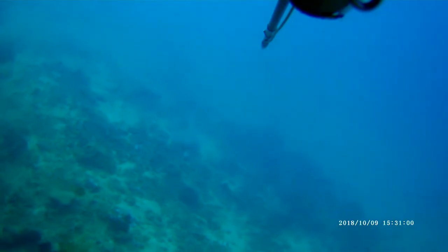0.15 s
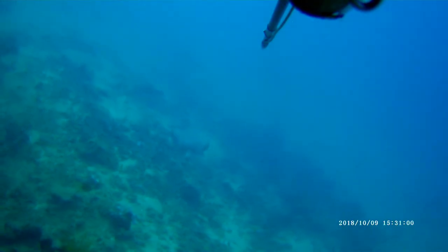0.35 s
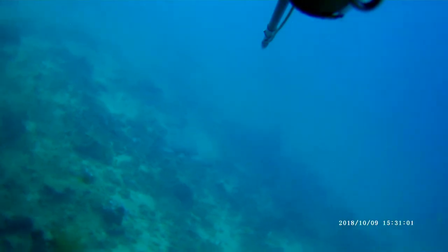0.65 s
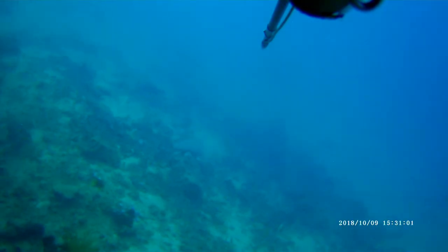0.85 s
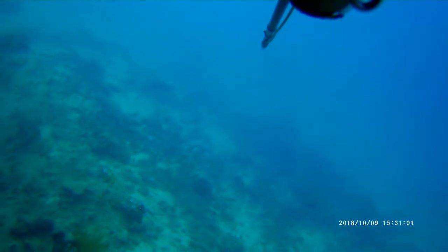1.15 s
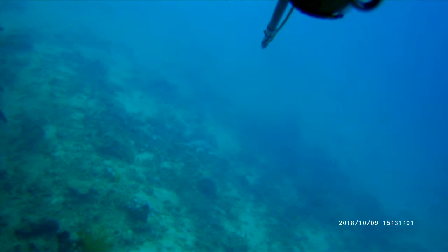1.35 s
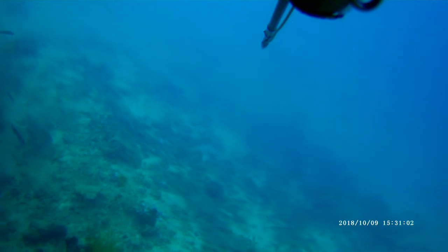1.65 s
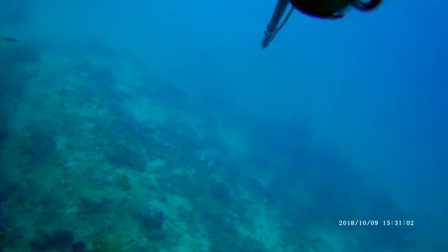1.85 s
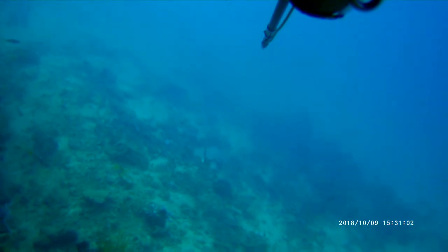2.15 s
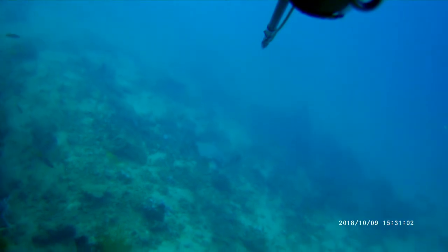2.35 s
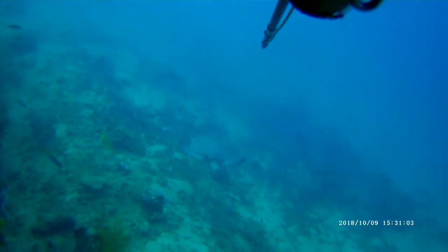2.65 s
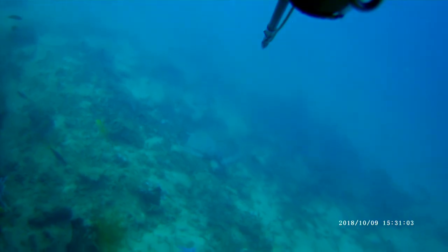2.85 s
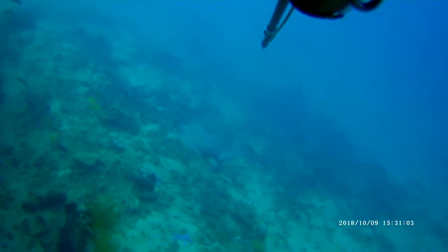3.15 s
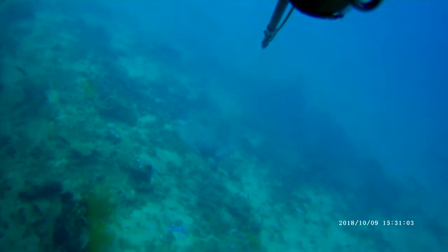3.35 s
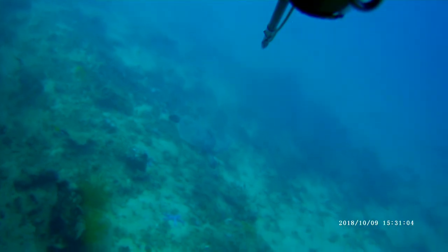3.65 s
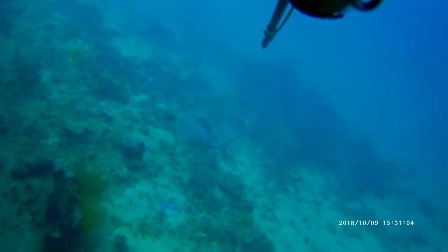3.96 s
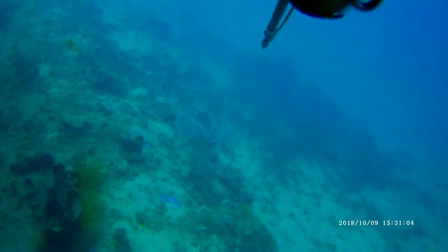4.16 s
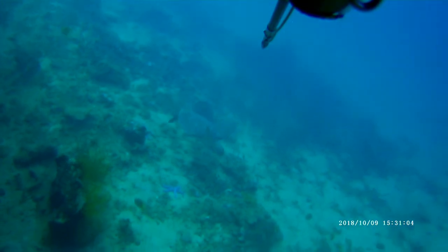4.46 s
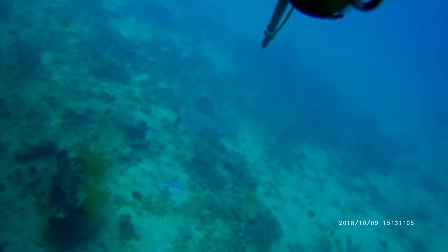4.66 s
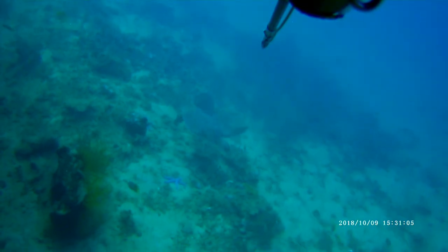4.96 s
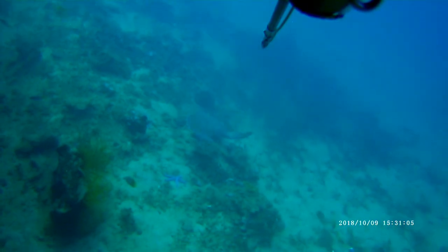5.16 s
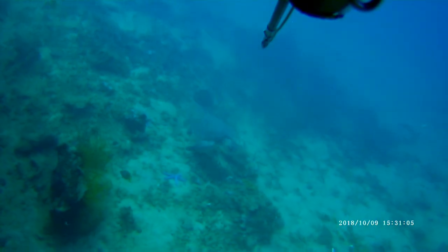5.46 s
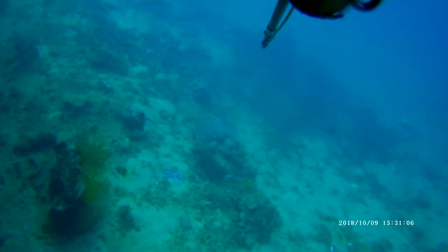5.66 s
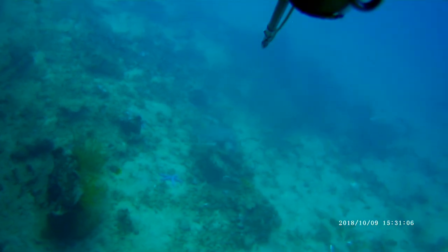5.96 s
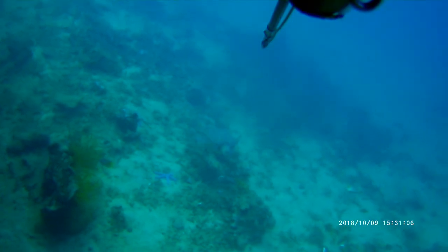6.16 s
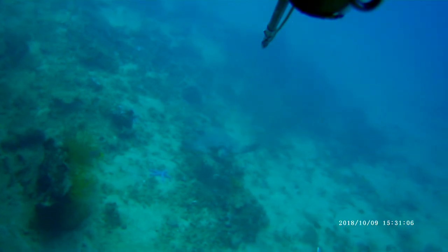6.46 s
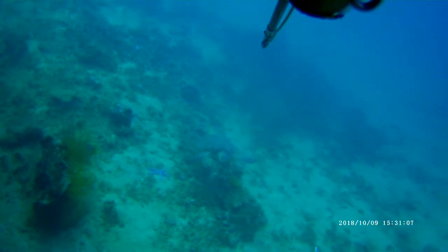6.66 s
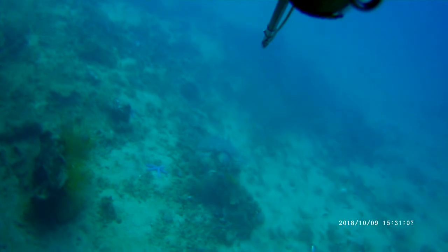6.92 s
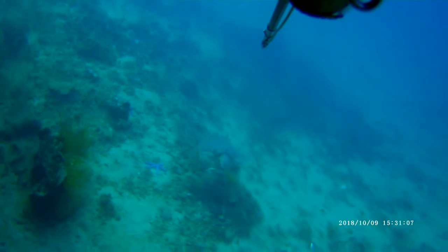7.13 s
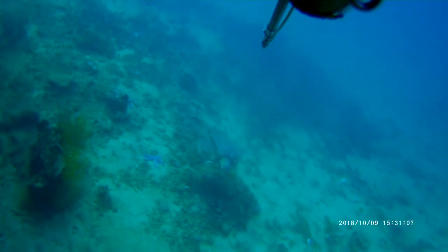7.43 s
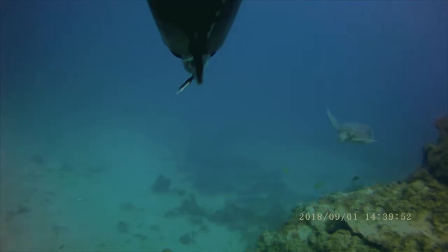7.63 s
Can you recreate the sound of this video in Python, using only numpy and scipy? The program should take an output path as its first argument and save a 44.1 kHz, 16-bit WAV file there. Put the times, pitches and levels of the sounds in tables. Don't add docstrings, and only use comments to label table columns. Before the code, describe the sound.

Throughout, a quiet, muffled wash of water and faint electronic hiss fills a sealed camera housing, sprinkled with fine distant shrimp crackle and dull gurgling squeaks. At 0.2 s a short bubbly blip rings and dies; around 0.4 s the case groans briefly with a soft knock and scrape. From 1.45 to 1.9 s comes a quick cluster of hollow, mid-pitched knocks, each doubled by a close echo, then another at 2.3 s. Until 4 s there are only faint ticks, far knocks and a low flexing moan. Louder knocks land at 4.05, 4.4 and 4.65 s, with a strong ringing snap near 4.45 s. After a lull, more knocks come between 5.6 and 6.1 s, and at 6.4 and 6.6 s, the last among the loudest. From 6.8 s scratchy scrapes and small knocks gather, and rubbing swells around 7.5 s before easing at the end.

```python
import sys
import numpy as np
from scipy import signal
from scipy.io import wavfile
from scipy.ndimage import uniform_filter1d

SR = 44100
rng = np.random.default_rng(int(sys.argv[2]) if len(sys.argv) > 2 else 0)


def int16_out(signal):
    q = np.round(np.clip(np.atleast_2d(signal).T, -1, 1) * 32767)
    wavfile.write(sys.argv[1], SR, q.astype(np.int16))


def gain_from_db(level_db):
    decades = np.asarray(level_db, float) / 20
    return 10 ** decades


N = 343539


def evened(x):
    return x / np.sqrt(np.mean(x ** 2) + 1e-20)


def smoothed(x, size):
    return uniform_filter1d(uniform_filter1d(x, size=size), size=size)


def add(mix, s, sound):
    part = mix[round(s * SR):][:len(sound)]
    part += sound[:len(part)]


def resonate(x, hz, width):
    turn = np.exp(2j * np.pi * np.cumsum(hz * np.ones(len(x))) / SR)
    r = np.exp(-np.pi * width / SR)
    return 2 * (turn * signal.lfilter([1 - r], [1, -r], x / turn)).real


def twice(x, hz, width):
    return resonate(resonate(x, hz, width), hz, width)


def sparse(per_s, spread_db):
    when = rng.random(N) < per_s / SR
    size = np.minimum(rng.exponential(1, N), 4)
    sign = rng.choice([-1., 1.], N)
    return evened(when * gain_from_db(spread_db * size) * sign)


def gaussian_burst(t, ms, hz):
    return np.exp(-.5 * (1000 * t / ms) ** 2) * np.cos(2 * np.pi * hz * t)


def housing(tilt_db=0, spread_db=0, damp_db=0):
    # f/Hz, width/Hz, level/dB, arrival/ms, second pass/dB
    modes = [(730.0, 590.0, -25.1, 0.36, -3), (1090.0, 180.0, -27.2, 0.79, -2),
             (1310.0, 270.0, -5.3, 0.59, -4), (1500.0, 60.0, -16.7, 0.84, -3),
             (1710.0, 700.0, -14.1, 0.21, -10), (2290.0, 250.0, -14.7, 0.26, -14),
             (3200.0, 200.0, -12.0, 0.5, 0), (3260.0, 190.0, -5.9, 0.38, -4),
             (4590.0, 390.0, -5.0, 0.81, -24), (5540.0, 790.0, -22.3, 0.25, -32),
             (6150.0, 530.0, -18.4, 0.07, -27), (7780.0, 390.0, -51.7, 0.09, -7),
             (9180.0, 300.0, -50.0, 0.68, -9), (11160.0, 1820.0, -73.9, 0.48, 0)]
    hz, width, db, ms, again_db = np.transpose(modes)[:, :, None]
    round_trip_ms = 2.9
    t, out = np.arange(768) / SR, 0
    direction_db = spread_db * rng.standard_normal((2, len(modes), 1))
    first_pass = (0, direction_db[0])
    second_pass = (round_trip_ms, again_db - damp_db + direction_db[1])
    for late_ms, pass_db in (first_pass, second_pass):
        age = np.maximum(t - (ms + late_ms) / 1000, 0)
        u = np.pi * 3 * width * age
        height = gain_from_db(db + pass_db + tilt_db * np.log2(hz / 4480)) * width
        out = out + (height * u ** 3 * np.exp(-u) * np.sin(2 * np.pi * hz * age)).sum(0)
    return signal.lfilter(*signal.butter(3, 500, "high", fs=SR), out)


def read(points, hz):
    f, value = np.transpose(points)
    return np.interp(np.log(hz + 1), np.log(f + 1), value)


def noise(spectrum, patchy_db):
    frames, hz = N // 256 + 5, np.fft.rfftfreq(1024, 1 / SR)
    a, b, patches = rng.standard_normal((frames, 513, 3)).T
    patches = uniform_filter1d(patches, size=10, axis=0)
    patches = evened(uniform_filter1d(patches, size=6, axis=1))
    z = (a + 1j * b) * gain_from_db(read(spectrum, hz)[:, None] + patchy_db * patches)
    return evened(signal.istft(z, nperseg=1024, noverlap=768)[1][:N])


def wash():
    # f/Hz, level per Hz/dB
    water, water_db = [(15, -86), (25, -49.5), (294, -8), (485, -5.5), (832, -6.5), (1370, -4),
                       (1710, -9.5), (1970, -12), (3000, -17), (3900, -49.5), (6600, -120)], -67.5
    # f/Hz, level per Hz/dB
    hiss, hiss_db = [(1530, -26), (2600, -9), (3430, -0.5), (4070, -5.5), (5350, -9.5), (5600, -12.5),
                     (6320, -15.5), (7210, -22.5), (8200, -23), (9500, -26), (10200, -50.5), (15900, -87)], -79.5
    # f/Hz, width/Hz, level/dB
    whines = [(5180, 20, -90.5), (7825, 8, -106), (7885, 8, -104)]
    out = gain_from_db(water_db) * noise(water, 1.5) + gain_from_db(hiss_db) * noise(hiss, 1.0)
    for hz, width, db in whines:
        wander = np.cumsum(rng.standard_normal(N)) * np.sqrt(2 * np.pi * width / SR)
        out += gain_from_db(db) * np.sqrt(2) * np.sin(2 * np.pi * hz * np.arange(N) / SR + wander)
    return out


def gurgle():
    out, t = np.zeros(N), np.arange(-600, 600) / SR
    pitches = np.geomspace(950, 2300, num=16)
    for hz, ms, glide in zip(pitches, rng.uniform(2, 4, 16), rng.normal(0, 5, 16)):
        squeak = gaussian_burst(t, ms, hz * (1 + glide * t))
        out += signal.oaconvolve(sparse(45, 3.8), evened(squeak), "same")
    return evened(out)


def strain(t):
    # middle t/s, half length/s, wall moan level/dB, low frame groan level/dB
    flexes = [(0.043, .1, -84, -77), (0.392, 0.062, -51, -56), (0.519, 0.058, -64.5, -68),
              (1.023, 0.041, -82, -77), (2.67, 0.25, -72, -76.5), (3.134, 0.099, -68.5, -74),
              (3.43, 0.055, -72.5, -90), (3.653, 0.064, -74, -79.5), (4.187, 0.18, -64.5, -70),
              (6.307, 0.038, -69, -89), (6.855, 0.19, -65.5, -92), (7.284, 0.072, -59, -94),
              (7.501, 0.19, -63.5, -88)]
    s, half, moan_db, groan_db = np.transpose(flexes)[:, :, None]
    bump = np.exp(-((t - s) / half) ** 2)
    moan_gain = gain_from_db(-80.5) + (gain_from_db(moan_db) * bump).sum(0)
    groan_gain = gain_from_db(-88.5) + (gain_from_db(groan_db) * bump).sum(0)
    return moan_gain, groan_gain


def rubbing():
    # t/s, level/dB
    effort = [(0.0, -65.5), (0.28, -69), (0.37, -63.5), (0.47, -64), (0.56, -61), (0.67, -67),
              (1.67, -64.5), (1.78, -60), (1.93, -66.5), (2.6, -66.5), (3.9, -68), (4.1, -61.5), (4.2, -69),
              (5.2, -66), (6.6, -66), (6.82, -58.5), (7.55, -52.5), (7.68, -62)]
    # f/Hz, width/Hz, level/dB
    frame = [(160, 35, -3), (250, 30, 0)]
    t = np.arange(N) / SR
    rub_db = np.interp(t, *np.transpose(effort))
    moan_gain, groan_gain = strain(t)
    hz = 1400 - 200 * np.minimum(moan_gain / gain_from_db(-60), 1)
    shake, hush, drift = rng.standard_normal((3, N))
    dull = twice(gurgle() + 1.1 * hush + 1.6 * sparse(350, 3.1), hz, 1300)
    rub = evened(signal.oaconvolve(dull, housing(0.52))[:N])
    rub = evened(rub + 1.9 * evened(twice(dull, 1553, 1300)))
    clumps_db = 2.5 * evened(smoothed(drift[::-1], 500))
    groan = evened(sum(gain_from_db(db) * twice(shake, f, width) for f, width, db in frame))
    wall_hz = 1050 * (1 + .03 * evened(smoothed(drift, 3000)))
    moan = evened(twice(shake, wall_hz, 200))
    return gain_from_db(rub_db - 3.0 + clumps_db) * rub + gain_from_db(-7.5) * groan_gain * groan + moan_gain * moan


def knock(db, hz, ms):
    t = np.arange(-256, 256) / SR
    push = gaussian_burst(t, np.clip(ms, .12, 2), hz)
    thud_db = -5.9 * max(ms - .4, 0) - 0.046 * (hz - 1241.5) + .5 * (db + 24.5)
    thud = gain_from_db(thud_db) * gaussian_burst(t, 0.75, 820)
    edge = gaussian_burst(t, 0.35, 3200)
    sound = np.convolve(push + thud, housing(-3, 2.5, 2.5))
    sound[60:572] += gain_from_db(-35.5 + .4 * (db + 20.5)) * abs(sound).max() * edge
    sound = signal.lfilter(*signal.butter(3, 640, "high", fs=SR), sound)
    return abs(sound).argmax() / SR, gain_from_db(db) * sound / abs(sound).max()


def knocks():
    # t/s, peak level/dB, centre f/Hz, surface echo delay/ms, echo level/dB
    near = [(0.391, -38.5, 1040, 16, -5), (1.462, -30, 1150, 13.8, -1), (1.5194, -27.5, 1250, 15, -7),
            (1.558, -27.5, 1200, 15.6, -6.5), (1.6214, -29, 1180, 15.6, -5), (1.734, -27, 1310, 12.6, -7),
            (1.8843, -29.5, 1310, 12.3, -10), (2.31, -27.5, 1262, 12.2, -8), (4.048, -22.5, 1290, 13, -23),
            (4.4184, -22.5, 1250, 24, -27), (4.637, -21.5, 1300, 16.5, -29),
            (5.5897, -20.5, 1330, 16.6, -26), (5.8294, -21, 1330, 14.2, -22.5),
            (5.9723, -24, 1296, 13.8, -10.5), (6.105, -30, 1250, 13.4, -9), (6.4361, -24, 1320, 13, -18),
            (6.577, -18, 1310, 21.8, -21), (6.885, -35, 1270, 13.0, -4.5), (7.037, -38, 1460, 8.7, -7),
            (7.3087, -38, 1326, 10, -8), (7.4784, -29, 1125, 13.6, -8), (7.5064, -34.5, 1300, 11.5, -3.5),
            (7.5888, -30, 1100, 13.6, -9), (7.6279, -36, 1250, 13, -3.5)]
    # t/s, peak level/dB, centre f/Hz
    faint = [(0.077, -45.5, 1310), (0.575, -43.5, 1620), (0.748, -41, 1360), (1.194, -47.5, 1400),
             (1.6, -55, 1500), (2.129, -48.5, 1450), (2.236, -46, 1470), (2.409, -43.5, 1630),
             (2.56, -49, 1280), (2.869, -41.5, 1190), (2.882, -44.5, 1110), (3.051, -47, 1400),
             (3.078, -43.5, 1200), (3.369, -50.5, 1380), (3.41, -42.5, 1140), (3.592, -48.5, 1350),
             (3.898, -45.5, 1400), (3.991, -46.5, 1480), (4.805, -48, 1330), (5.058, -48.5, 1360),
             (5.782, -47.5, 1380), (5.818, -43.5, 1460), (6.46, -41.5, 1480), (6.526, -45, 1365),
             (6.537, -46, 1310), (6.807, -45.5, 1460), (6.832, -45, 1370), (6.877, -45.5, 1395),
             (6.918, -39, 1450), (7.612, -36.5, 1280)]
    # t/s, peak level/dB, centre f/Hz
    scrapes = [(0.348, -55, 1050), (0.364, -50, 1070), (0.371, -44.5, 1040), (0.385, -41.5, 1098),
               (0.468, -48.5, 1400), (1.814, -46.5, 1490), (2.04, -52, 1120), (2.217, -55.5, 950),
               (2.67, -55, 1040), (3.131, -51.5, 1010), (3.666, -53.5, 1110), (5.335, -52, 960),
               (5.612, -48.5, 1330), (6.469, -48.5, 1490), (6.93, -50, 1305), (6.959, -46, 1380),
               (7.031, -39, 1465), (7.08, -41.5, 1457), (7.092, -45.5, 1360), (7.165, -46.5, 1324),
               (7.2, -50, 1340), (7.244, -44, 1205), (7.284, -40, 1220), (7.297, -48, 1332),
               (7.414, -54, 1423), (7.535, -53.5, 1240)]
    near_ms, faint_ms, scrape_ms = 0.31, 0.29, 1.8
    out = np.zeros(N)
    for s, db, hz, echo_ms, echo_db in near:
        rise, sound = knock(db, hz, near_ms)
        add(out, s - rise, sound)
        rise, echo = knock(db + echo_db, 1.05 * hz, 1.1 * near_ms)
        add(out, s - rise + echo_ms / 1000, -echo)
    for rows, ms in ((faint, faint_ms), (scrapes, scrape_ms)):
        for s, db, hz in rows:
            rise, sound = knock(db, hz, ms)
            add(out, s - rise, sound)
    return out


def bubbles():
    # t/s, f/Hz, peak level/dB, t60/s
    loose = [(.2042, 1640, -27, .036), (.2162, 1490, -39, .11), (.2052, 945, -41, .12),
             (.2042, 1300, -33, .02), (3.0742, 525, -51, .03), (3.0742, 340, -54, .03),
             (6.9172, 2120, -48, .03), (6.9182, 1830, -49, .03), (7.3022, 2380, -53, .035),
             (7.4122, 2480, -50, .03), (7.5752, 2750, -61, .03)]
    sink, sink_s = 0.056, 0.0072
    out, t = np.zeros(N), np.arange(6000) / SR
    turns = t + sink * sink_s * (1 - np.exp(-t / sink_s))
    for s, hz, db, t60 in loose:
        start = (1 - np.exp(-t / 0.0011)) ** 2
        add(out, s, gain_from_db(db - 60 * t / t60) * start * np.sin(2 * np.pi * hz * turns))
    return out


def dry_burst():
    ms = 1000 * np.arange(768) / SR
    burst = rng.standard_normal(768) * ms * np.exp(-ms / .9)
    burst = signal.sosfilt(signal.butter(4, (2000, 4600), "band", fs=SR, output="sos"), burst)
    return burst / abs(burst).max()


def snaps():
    # t/s, peak level/dB, low ring against the treble/dB, crack level/dB
    shrimp = [(0.4796, -60, -3.5, -22.5), (1.0294, -58.5, -4, -26), (1.071, -60.5, -3, -24.5),
              (1.368, -67, 0, -27), (1.687, -63, 2, -21), (1.7556, -56, 0, -24), (1.7918, -58, 2, -27),
              (1.8933, -49, -2, -15.5), (2.068, -63, -2, -13.5), (2.177, -64.5, 1, -26),
              (2.382, -63, 14, -24), (2.64, -63.5, 1, -25), (2.812, -60, -4, -24), (2.957, -60.5, 2, -33),
              (3.2413, -65, 0, -20.5), (3.5225, -64.5, -31, -14.5), (3.5873, -61, 1, -21),
              (3.9576, -60, 1, -22.5), (4.3862, -59, 29, -27), (4.4614, -17, -6.5, -56),
              (4.8042, -58, -33, -12.5), (4.994, -49.5, -2, -27.5), (5.262, -63, 1, -36),
              (5.611, -71, 4, -17.5), (5.692, -65, -1, -39), (6.8671, -43.5, 1, -31),
              (7.0362, -60.5, 13.5, -34), (7.4134, -71, 16, -27), (7.635, -57, 12, -41),
              (7.6792, -63.5, 5, -26)]
    # f/Hz, level/dB
    wall = [(2500, -11), (3700, -7), (5400, -0.5), (6500, 2), (7700, -6.5), (8900, -19), (10300, -29.5)]
    out, t = np.zeros(N), np.arange(200) / SR
    crack = np.zeros(768)
    for hz, db in wall:
        crack[20:220] += gain_from_db(db) * t ** 2 * np.exp(-t / .00024) * np.sin(2 * np.pi * hz * t)
    crack /= abs(crack).max()
    for s, db, low_db, crack_db in shrimp:
        spread_db = np.clip(-.12 * (db + 18), 0, 4)
        ring = housing(np.clip(-1.2 * low_db - 8, -3, 14), spread_db)
        snap = ring / abs(ring).max() + gain_from_db(crack_db + 19.5) * crack
        snap += gain_from_db(-6.5) * spread_db / 4 * dry_burst()
        add(out, s - .0005, gain_from_db(db + 8.0) * snap)
    far_per_s, far_db = 160, -88
    ring = housing(1.2)
    far = signal.oaconvolve(sparse(far_per_s, 4.6), ring / abs(ring).max() + gain_from_db(-3.5) * crack)[:N]
    return out + gain_from_db(far_db) * evened(far)


def reef(x):
    tail_t60_s, tail_db = .055, -18
    t = np.arange(8000) / SR
    taps = (rng.random(len(t)) < .05) * rng.choice([-1., 1.], len(t))
    taps *= (t > .004) * gain_from_db(-60 * t / tail_t60_s)
    dull = twice(twice(x, 1600, 1200), 1600, 1200)
    return signal.oaconvolve(dull, gain_from_db(tail_db) * taps / np.linalg.norm(taps))[:N]


def scene():
    background = wash() + rubbing()
    near = knocks() + bubbles() + snaps()
    return (background + near + reef(near))[None]


def low_pass(x):
    return signal.sosfilt(signal.butter(12, 15500, fs=SR, output="sos"), x)


def record(dry):
    heard = signal.lfilter(*signal.butter(2, 45, "high", fs=SR), dry)
    return low_pass(heard)


dry = scene()
out = record(dry)
int16_out(out)
```